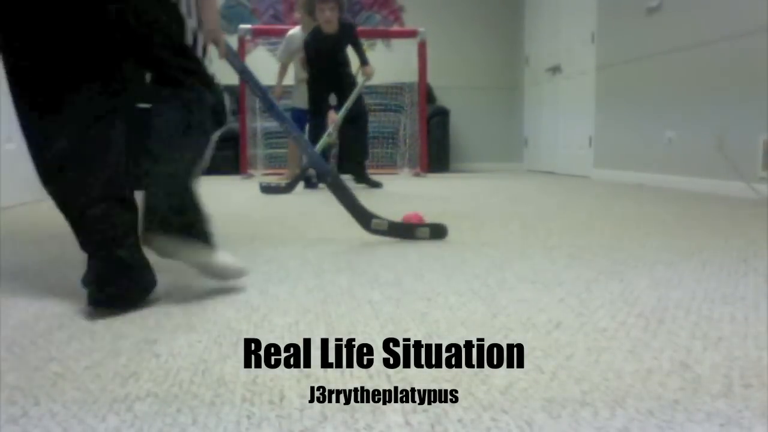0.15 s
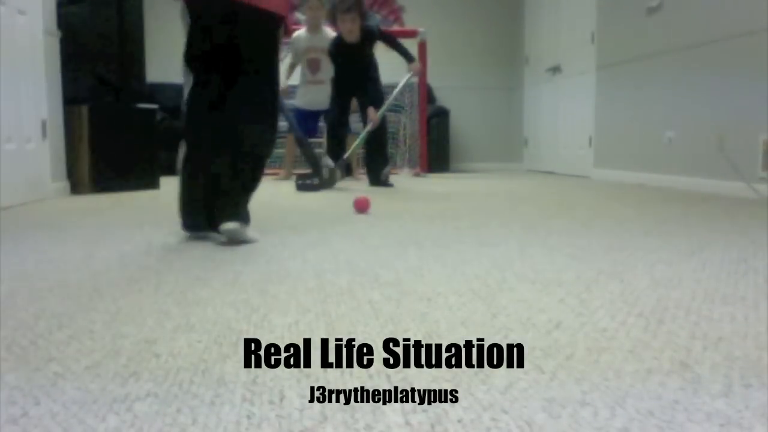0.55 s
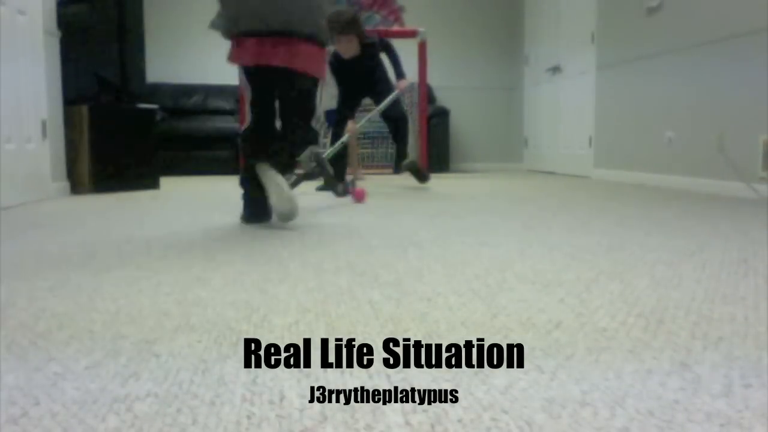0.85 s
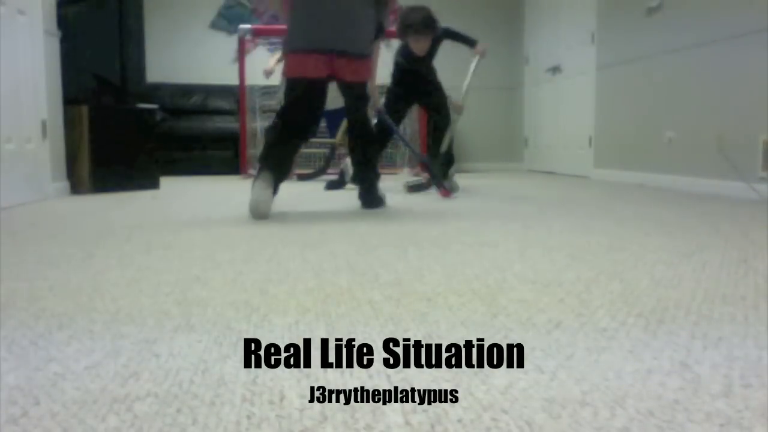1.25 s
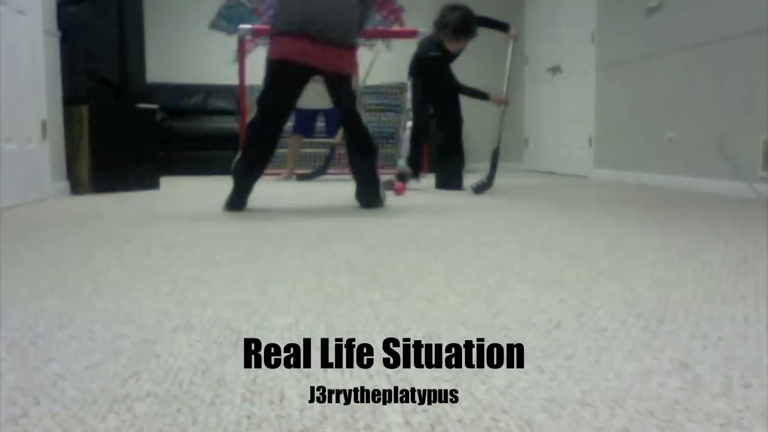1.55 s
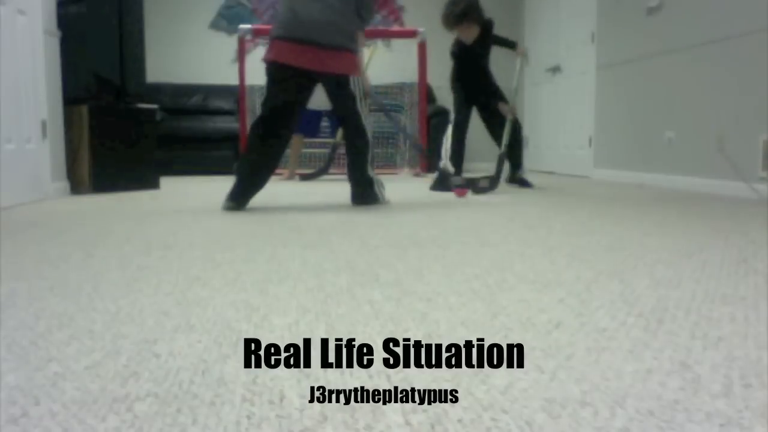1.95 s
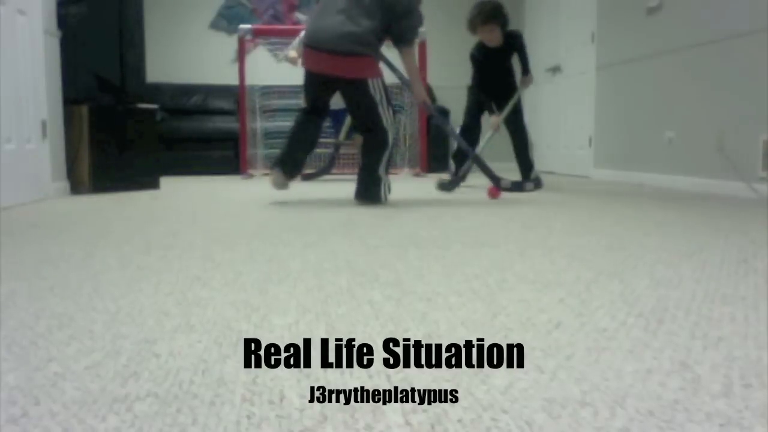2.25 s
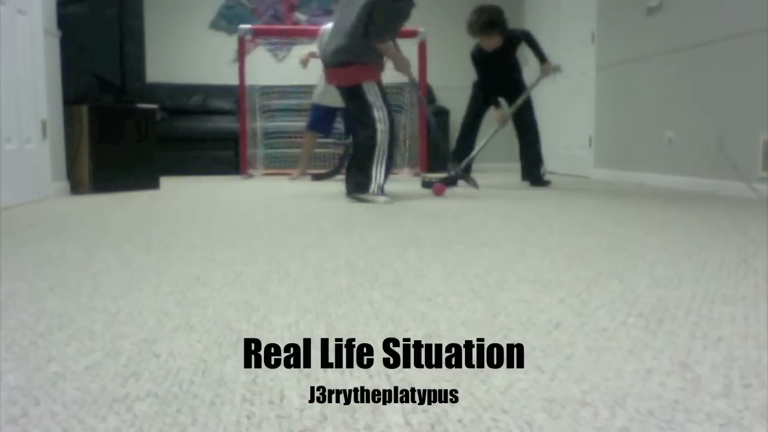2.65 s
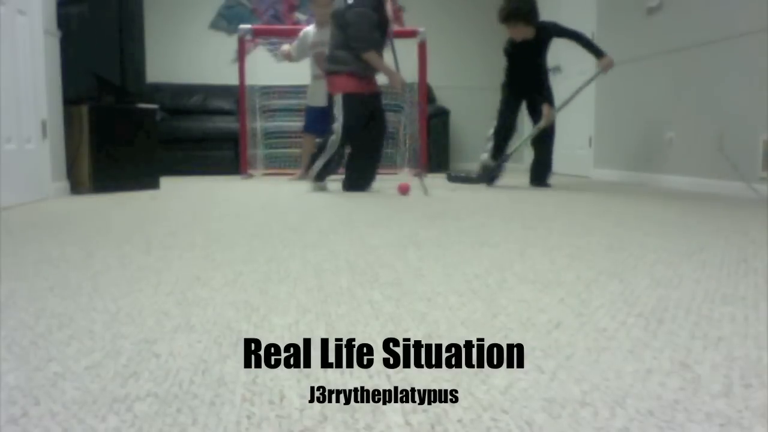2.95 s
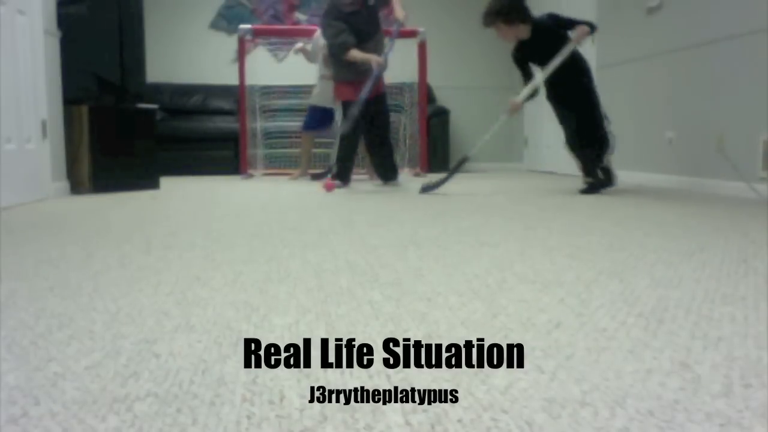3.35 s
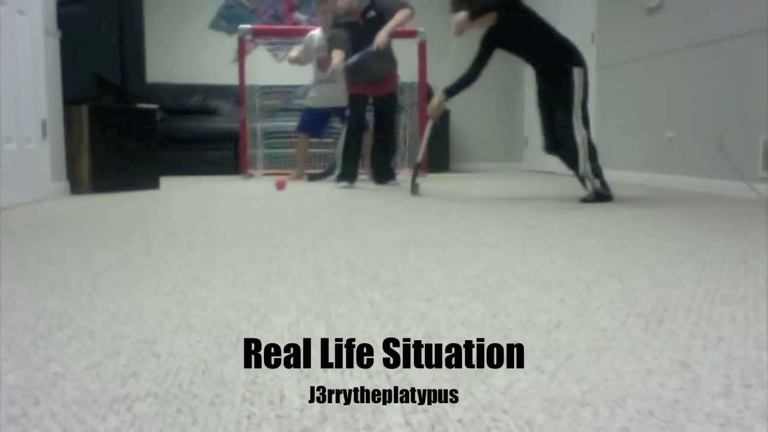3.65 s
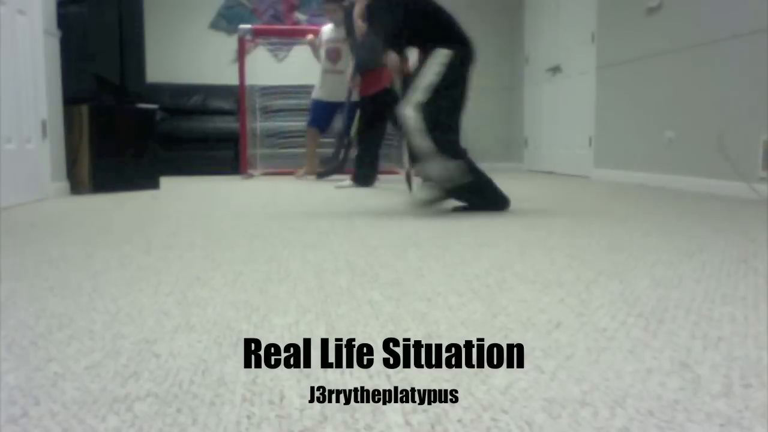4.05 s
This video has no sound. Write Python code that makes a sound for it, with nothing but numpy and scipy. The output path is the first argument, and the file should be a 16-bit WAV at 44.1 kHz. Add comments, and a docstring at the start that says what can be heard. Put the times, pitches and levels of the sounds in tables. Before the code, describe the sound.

Scattered plastic clacks and padded thumps of indoor floor hockey, with light brushing on carpet and one loud crack near the end.

```python
"""A carpeted basement room where children play floor hockey.
Plastic blades clack against a small ball and each other: a graze, a crack, a run of dying bounces.
Blades, ball and feet thud on the padded floor and set the room's standing waves booming.
Between the blows, trousers and blades brush along and swish on the carpet, while the floor
rumbles under the players over a faint drone and hiss."""
import sys
import numpy as np
from scipy import signal
from scipy.fft import rfft, irfft
from scipy.io import wavfile

SR = 44100
rng = np.random.default_rng(int(sys.argv[2]) if len(sys.argv) > 2 else 0)


def unload_audio(sound):
    """Save the sound as a 16-bit wav file, at the path given as the first command line argument."""
    columns = np.transpose(np.atleast_2d(sound))
    # keep every value between -1 and 1, then stretch to whole-number steps
    steps = np.round(np.clip(columns, -1, 1) * 32767)
    wavfile.write(sys.argv[1], SR, steps.astype(np.int16))


N = 184645
TIME = np.arange(N) / SR
BLOW_TIME = TIME[:SR // 2]


def from_db(db):
    """Decibels to gain."""
    return 10 ** (np.asarray(db) / 20)


def rms_one(x):
    """Scale to rms 1."""
    return x / np.sqrt(np.mean(x ** 2) + 1e-20)


def at_hz(points, hz):
    """Read each column of a table on a log-frequency axis."""
    known, *columns = np.transpose(points)
    return [np.interp(np.log(hz), np.log(known), column) for column in columns]


def cut(x, hz, kind, order=2):
    """Butterworth filter; kind names the band that passes."""
    sections = signal.butter(order, np.clip(hz, 10, .45 * SR), kind, fs=SR, output="sos")
    return signal.sosfilt(sections, x + 1e-18)


def resonate(x, hz, width):
    """One resonance with unity gain at its peak."""
    r = np.exp(-np.pi * width / SR)
    feedback = [1, -2 * r * np.cos(2 * np.pi * hz / SR), r * r]
    return signal.lfilter(np.array([1, 0, -1]) * (1 - r * r) / 2, feedback, x + 1e-18)


def coloured_noise(spectrum):
    """Steady noise shaped by an EQ curve, rms 1."""
    hz = np.maximum(np.arange(N // 2 + 1) * SR / N, 1)
    inside = (hz >= spectrum[0][0]) & (hz <= spectrum[-1][0])
    eq = from_db(at_hz(spectrum, hz)[0]) * inside
    return rms_one(irfft(rfft(rng.standard_normal(N)) * eq, N))


def add(track, s, sound):
    """Mix a sound into a track from time s on."""
    start = round(s * SR)
    track[start:start + len(sound)] += sound[:max(N - start, 0)]


def floor_rumble():
    """The players' feet keep the floor rumbling in slow swells."""
    # envelope of the footfall (time [s], level [dB])
    swells = [(0.0, -61), (0.29, -58), (0.72, -63.5), (1.61, -58.5), (2.04, -65), (2.41, -61.5),
              (2.77, -68), (3.05, -63.5), (3.24, -57.5), (3.88, -61), (4.06, -58.5), (4.19, -61)]
    # tone of the floor (frequency [Hz], relative level [dB])
    spectrum = [(15, -70), (25, -29), (37, -25), (50, -6), (70, 1), (151, -1.5), (183, 3.5), (293, -1.5),
                (368, -1), (440, -12), (509, -12.5), (560, -10), (1200, -27.5), (1560, -66), (2640, -120)]
    return from_db(np.interp(TIME, *np.transpose(swells))) * coloured_noise(spectrum)


def brushing():
    """Cloth and blades slide along and catch on loops of the carpet, which adds grain."""
    # envelope of the sliding (time [s], level [dB])
    strokes = [(0.0, -72.5), (0.34, -68), (0.63, -80.0), (1.1, -75.5), (1.16, -67), (1.36, -69),
               (1.66, -69), (1.95, -81.5), (2.0, -77.5), (2.33, -72), (2.59, -74), (2.69, -86), (2.79, -78),
               (2.92, -77.5), (3.22, -67), (3.53, -70.0), (3.73, -78), (4.1, -67.5)]
    # tone of the friction (frequency [Hz], relative level [dB])
    spectrum = [(410, -95), (700, -10.5), (776, -10), (1100, -13), (1390, -8), (1520, -7), (2730, -7),
                (3770, -9), (4190, -15), (5500, -11), (8430, -19.5), (13400, -34.5), (15500, -49)]
    catches_per_s, catch_db, release_s = 35, 5.6, 0.012
    stroke_db = np.interp(TIME, *np.transpose(strokes))
    catches = (rng.random(N) < catches_per_s / SR) * rng.uniform(0, 1, N)
    grain_db = catch_db * signal.lfilter([1], [1, -np.exp(-1 / (release_s * SR))], catches + 1e-18)
    return from_db(stroke_db + grain_db) * coloured_noise(spectrum)


def room_tone():
    """A faint wavering drone and a steady hiss."""
    # narrow noise bands of the drone (frequency [Hz], width [Hz], level [dB])
    drone_bands = [(82.9, 7.1, -69.5), (243.3, 10, -74)]
    # tone of the hiss (frequency [Hz], relative level [dB])
    hiss_spectrum = [(20, 1), (700, -10.5), (1200, 10), (3000, 5.5), (4300, -10), (7500, 1), (12000, -6),
                     (15700, -19.5)]
    drone, hiss_db = 0, -87
    for hz, width, db in drone_bands:
        band = resonate(rng.standard_normal(N + SR), hz, width)[SR:]   # a second to settle
        drone += from_db(db) * rms_one(band)
    return drone + from_db(hiss_db) * coloured_noise(hiss_spectrum)


def padded_push(hz, width):
    """A blow on padding: a few damped swings, peak 1."""
    t = BLOW_TIME
    push = np.sin(2 * np.pi * hz * t) * np.exp(-np.pi * width * t)
    push *= 1 - np.exp(-t * hz / 0.88)   # the padding takes about a cycle to compress
    push = cut(push, 1.94 * hz, "low", order=4)   # the carpet swallows the sharp edge
    push = cut(push, 0.37 * hz, "high", order=3)   # a small body radiates little bass
    return push / np.abs(push).max()


def room(sound, wet_db):
    """Direct sound, early reflections and a diffuse tail, fresh for every contact."""
    # reverb tail (frequency [Hz], time to fall 60 dB [s], relative level [dB])
    reverb = [(100, 0.57, -4), (300, 0.31, -8), (880, 0.12, 4.5), (2590, 0.18, -3.5), (6000, 0.15, -4),
              (11000, 0.14, -2.5)]
    # reflections off walls and ceiling (delay [s], gain [linear])
    reflections = [(.0031, 0.21), (.0068, 0.08), (0.011, 0.33), (0.0157, 0.11)]
    late_db, late_t60_s, build_up_s = -31.5, 0.36, 0.0025
    hold = 1.134   # above 1 the tail holds for a moment, then falls faster
    t, tail = BLOW_TIME, 0
    white = rng.standard_normal((2, len(t)))
    octave_edges = 62.5 * 2. ** np.arange(9)
    for k, band in enumerate(zip(octave_edges, octave_edges[1:])):
        t60, level_db = at_hz(reverb, np.sqrt(np.prod(band)))
        fade = from_db(-60 * (t / t60) ** hold) + from_db(late_db - 60 * t / late_t60_s)
        tail += from_db(level_db) * fade * cut(white[k % 2], band, "band")
    response = from_db(wet_db) * tail * (1 - np.exp(-t / build_up_s))
    response[0] += 1   # direct sound
    for delay, gain in reflections:
        response += gain * np.maximum(1 - np.abs(t - delay) * SR, 0)
    return signal.fftconvolve(sound, response)


def thuds():
    """A padded blow wakes the room's boom, springs back and lands again, lower, with a hollow knock."""
    # dull blows of blades, ball and feet; rebound, knock and boom are relative to the blow (time [s],
    # level [dB], pitch [Hz], width [Hz], rebound [dB], knock [dB], boom send [dB], reverb send [dB])
    blows = [(0.1689, -29, 440, 255, -10, -15, -27.5, -26), (0.3726, -26.5, 534, 294, 1, -4, -21, -28.5),
             (0.392, -36.5, 104.8, 41, -25, -31, -25, -50), (0.855, -54, 367, 400, 4.5, -2.5, -14.5, -26),
             (1.189, -41.5, 274, 127, 16, -3, -12.5, -36), (1.25, -33, 362, 266, -1, -8.5, -27.5, -29.5),
             (1.6717, -32, 408, 227, -1.5, -5.5, -26, -29), (2.255, -54.5, 322, 250, -17, -5, -11.5, -21.5),
             (3.055, -42, 452, 185, -11, -22, -73, -20), (3.068, -36, 317, 207, 0, -5, -11.5, -26),
             (3.355, -49.5, 253, 59, -15, -19, -33, -18), (3.41, -54.5, 563, 98, -14, -19, -18, -27),
             (3.469, -53.5, 320, 34, -3.5, -6.5, -33, -25), (3.8122, -19, 422, 332, -1, -4, -20.5, -28.5),
             (3.857, -31.5, 313, 150, -2.5, -22, -42, -38), (4.1268, -34, 602, 25, -12, -30, -40, -30),
             (4.1291, -21.5, 327, 127, 2.5, -28, -13, -21), (4.1551, -19, 206, 100, -8, -25, -17, -27)]
    # standing waves of floor and room (frequency [Hz], relative level [dB], t60 [s])
    modes = [(180.1, 10.5, 0.27), (241, 11, 0.16), (267.6, 10.5, 0.085), (337.1, 9, 0.26), (385, -17, 0.9),
             (468, -12, 0.094), (564, -21, 0.15), (700, -20.5, 0.11), (688, -15, 0.41), (758, -7, 0.27)]
    rebound_s, rebound_pitch_ratio, boom_attack_s = 0.0101, 0.864, 0.0075
    out, t = np.zeros(N), BLOW_TIME
    boom = sum(from_db(db - 60 * t / t60) * np.sin(2 * np.pi * hz * t) for hz, db, t60 in modes)
    boom *= 1 - np.exp(-t / boom_attack_s)
    knock = padded_push(hz=674, width=315)
    for s, level_db, hz, width, rebound_db, knock_db, boom_db, wet_db in blows:
        rebound = from_db(rebound_db) * padded_push(rebound_pitch_ratio * hz, width)
        rebound += from_db(knock_db) * knock
        add(out, s, from_db(level_db) * room(padded_push(hz, width), wet_db))
        add(out, s + rebound_s, from_db(level_db) * room(rebound, wet_db))
        add(out, s, from_db(level_db + boom_db) * boom)
    return out


def blade_contact(low_hz, top_hz, treble_db, chatter_s):
    """A snap and a brief chatter of smaller touches ring the plastic blade within a given band."""
    # resonances of the blade (frequency [Hz], width [Hz], relative level [dB])
    modes = [(1241, 680, 12.5), (1696, 54, -2), (2282, 1000, 3.5), (2534, 62, 4), (2713, 140, 8),
             (3005, 68, 6), (3330, 430, 8), (3870, 63, -6.5), (4660, 290, 1.5), (5070, 710, 8.5),
             (5671, 280, -15), (6560, 810, 1), (7250, 190, -1.4), (8320, 420, -13), (9501, 670, -28),
             (13800, 1600, 1)]
    touches_per_s, chatter_gain, snap_gain, treble_hz = 7001, 0.38, 0.24, 4200
    t = BLOW_TIME[:SR // 10]
    touching = rng.random(len(t)) < touches_per_s / SR
    touches = chatter_gain * rng.choice([-1, 1], len(t)) * touching * np.exp(-t / chatter_s)
    touches[0] = 1   # the strike itself
    ring = sum(from_db(db + treble_db * (hz > treble_hz)) * resonate(touches, hz, width)
               for hz, width, db in modes)
    snap = snap_gain * from_db(treble_db / 2) * touches
    crack = cut(ring + snap, low_hz, "high", order=6)
    crack = cut(crack, top_hz, "low", order=8)
    return crack / np.sqrt(np.sum(crack ** 2) / (.002 * SR))   # the energy of 2 ms at rms 1


def clacks():
    """Plastic grazes, cracks, then bounces; each bounce is lighter and so brighter and shorter."""
    # hard plastic hits (time [s], level [dB], low cut [Hz], high cut [Hz], treble [dB],
    # chatter decay [s], graze lead [s], graze relative to the hit [dB], bounce gap [s],
    # loss per bounce [dB], reverb send [dB])
    hits = [(0.176, -34, 1610, 11400, -3, 0.0029, 0.0054, -3.5, .0052, 3, -26.5),
            (0.3769, -48, 860, 2480, -26, 0.0056, 0.005, -18, 0.0062, 7, -32.5),
            (0.8608, -38.5, 3390, 8840, -3.5, 0.00062, 0.0043, -6.5, 0.0026, 26, -24.5),
            (1.2002, -54.5, 1530, 1700, -6, 0.0029, .005, -17, 0.0044, 5, -29),
            (1.2555, -40.5, 1730, 12200, 0.5, 0.0026, .0036, -8, .0045, 3.3, -17.5),
            (1.6746, -39.5, 2300, 11200, 5.5, 0.00058, 0.0036, -21, 0.004, 4.5, -25.5),
            (2.2531, -54.5, 2950, 6200, -1, 0.0028, .004, -12, 0.004, 3, -20.5),
            (3.0706, -37.5, 2500, 11400, -1, 0.0025, 0.0042, -17, 0.0061, 4.5, -22.5),
            (3.8166, -16.5, 1670, 12900, -0.5, 0.0038, .0037, -14, 0.0051, 4.5, -23.5),
            (4.1384, -47.5, 1400, 8100, -4.5, 0.005, .0075, -1, 0.0072, 23, -17)]
    bounces, gap_jitter, brighter_db, chatter_ratio = 3, .06, 2.5, 0.68
    out = np.zeros(N)
    for s, db, low_hz, top_hz, treble_db, chatter_s, lead_s, graze_db, gap_s, loss_db, wet_db in hits:
        graze = blade_contact(low_hz, top_hz, treble_db, chatter_s)
        add(out, s - lead_s, from_db(db + graze_db) * room(graze, wet_db))
        for k in range(bounces + 1):
            when = s + k * gap_s * (1 + gap_jitter * rng.uniform(-1, 1))
            decay_s = chatter_s * chatter_ratio ** k
            crack = blade_contact(low_hz, top_hz, treble_db + k * brighter_db, decay_s)
            add(out, when, from_db(db - k * loss_db) * room(crack, wet_db))
    return out


def swishes_and_tick():
    """Short swishes on the carpet, and one faint high tick: bands of noise that swell and fade."""
    # noise bursts (peak time [s], level [dB], swell half-width [s], band centre [Hz])
    bursts = [(0.418, -67, 0.0027, 7940), (0.456, -66.5, 0.007, 3000), (1.036, -74.5, 0.019, 3000),
              (1.166, -66.5, 0.0069, 4630), (2.038, -74.5, .035, 2970), (2.173, -72, 0.019, 4970),
              (2.8, -78.5, 0.023, 7300), (3.237, -66.5, 0.047, 6650), (3.6, -54.5, 0.019, 1980),
              (3.915, -51, 0.052, 2850), (3.906, -52.5, 0.046, 7200)]
    out = np.zeros(N)
    for s, level_db, half_width_s, hz in bursts:
        band = resonate(rng.standard_normal(N), hz, width=990)
        softened = rms_one(cut(band, 6700, "low", order=4))
        swell = np.exp(-.5 * ((TIME - s) / half_width_s) ** 2)
        out += from_db(level_db) * softened * swell
    return out


def scene():
    """The whole game in mono, heard from one spot on the floor."""
    return (clacks() + thuds() + swishes_and_tick() + floor_rumble() + brushing() + room_tone())[None]


def record(dry):
    """A small microphone loses the deep bass; the top is cut steeply."""
    low_cut_hz, high_cut_hz = 65, 15750
    thin = cut(dry, low_cut_hz, "high")
    return signal.sosfilt(signal.ellip(10, .1, 80, high_cut_hz, fs=SR, output="sos"), thin)


dry = scene()
out = record(dry)
unload_audio(out)
```